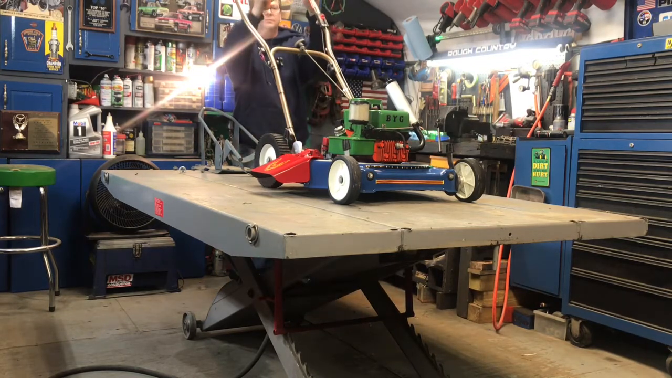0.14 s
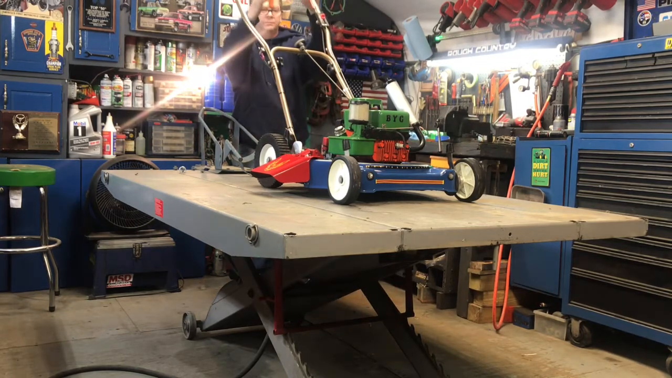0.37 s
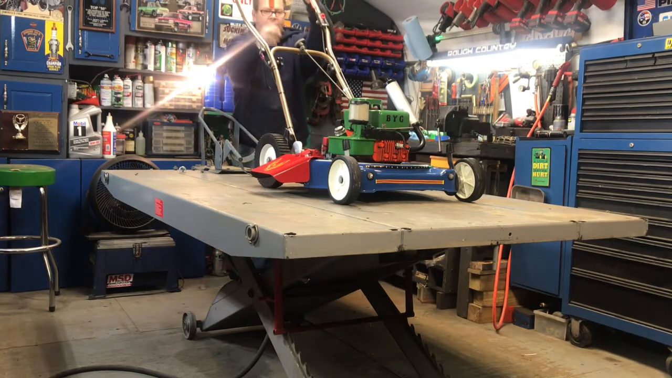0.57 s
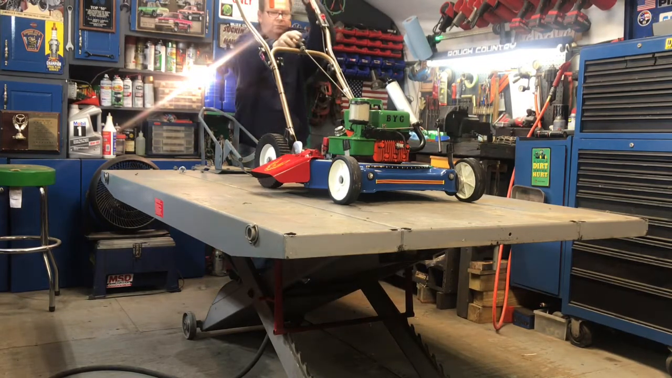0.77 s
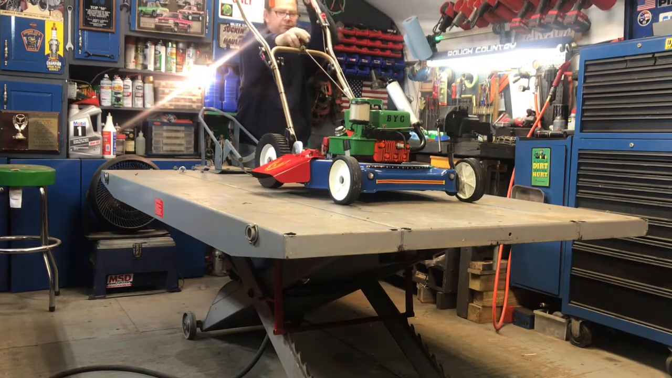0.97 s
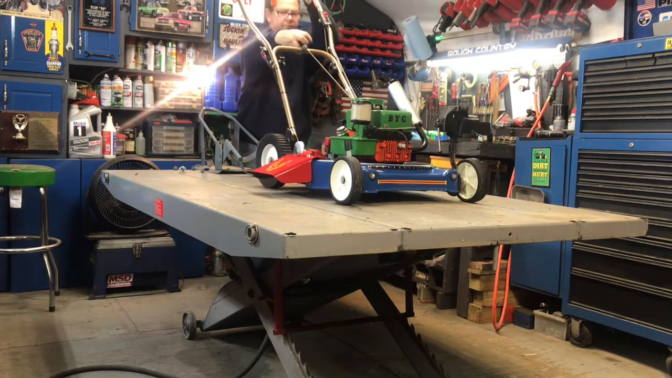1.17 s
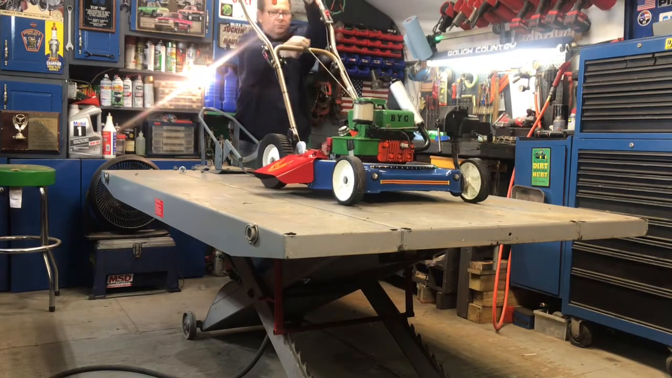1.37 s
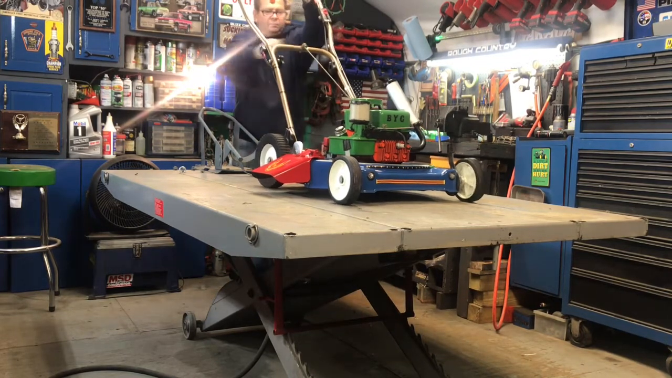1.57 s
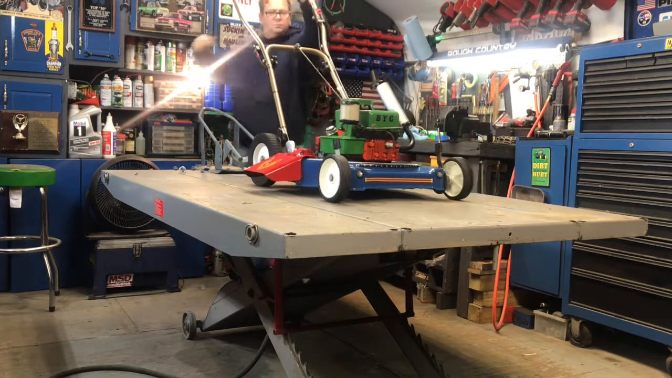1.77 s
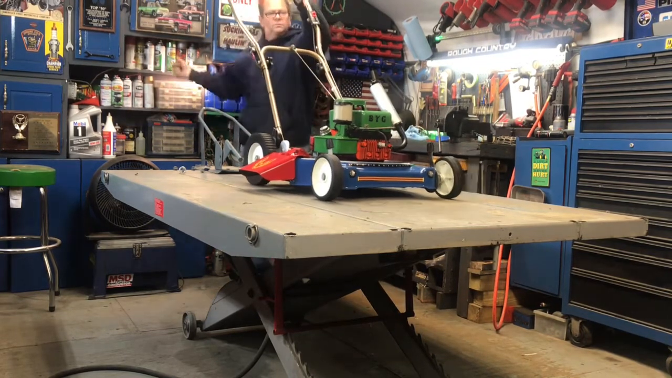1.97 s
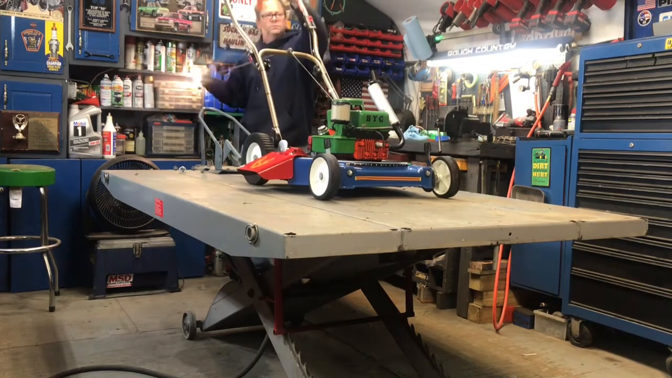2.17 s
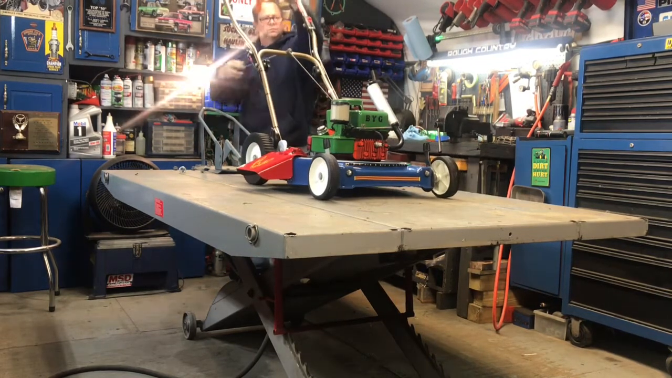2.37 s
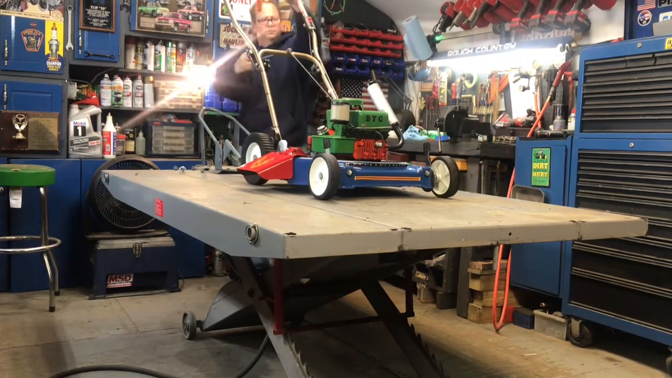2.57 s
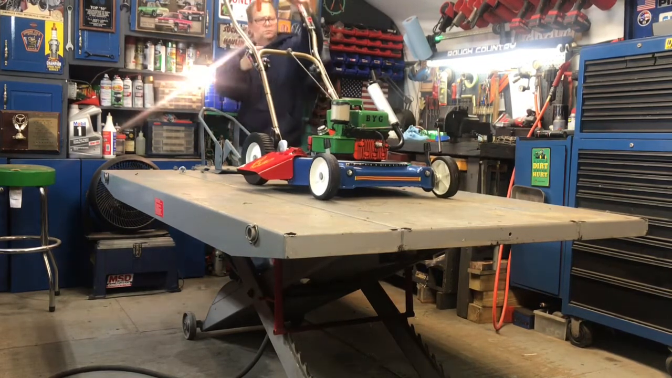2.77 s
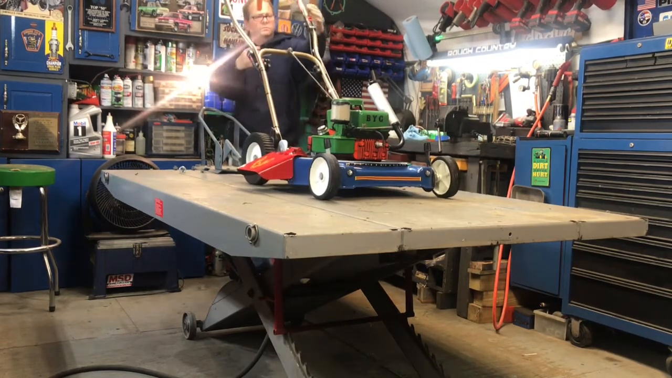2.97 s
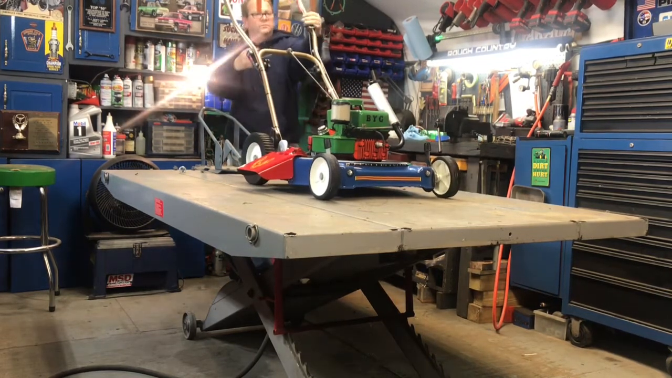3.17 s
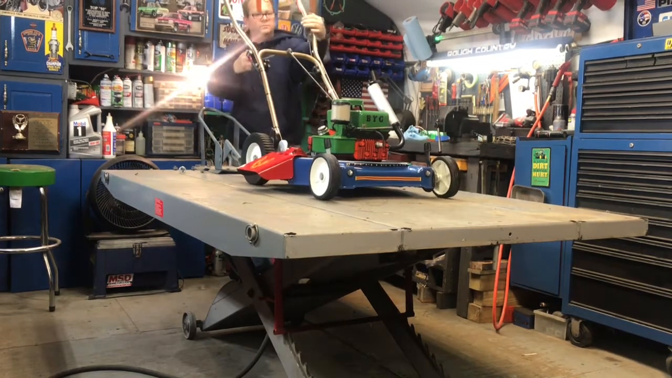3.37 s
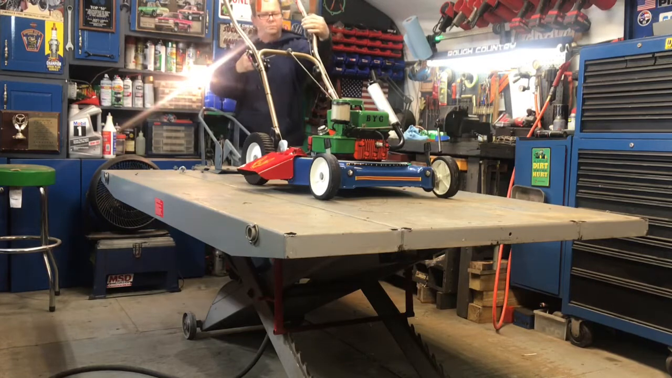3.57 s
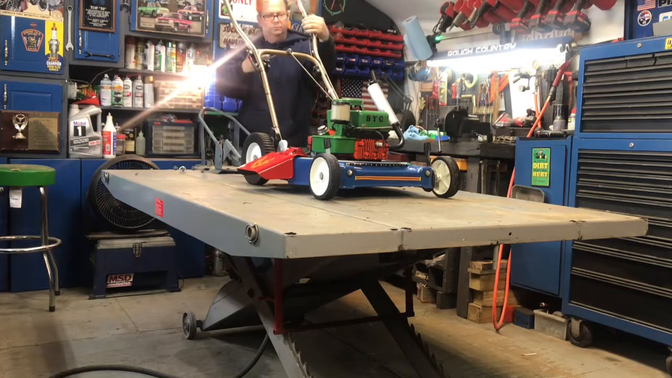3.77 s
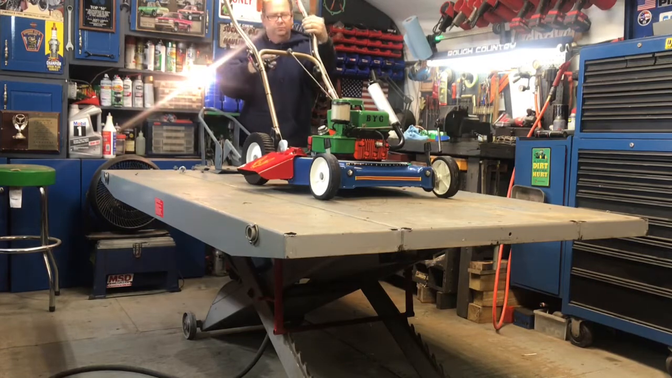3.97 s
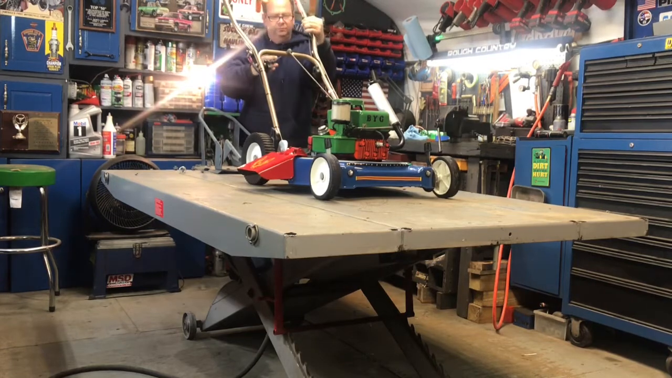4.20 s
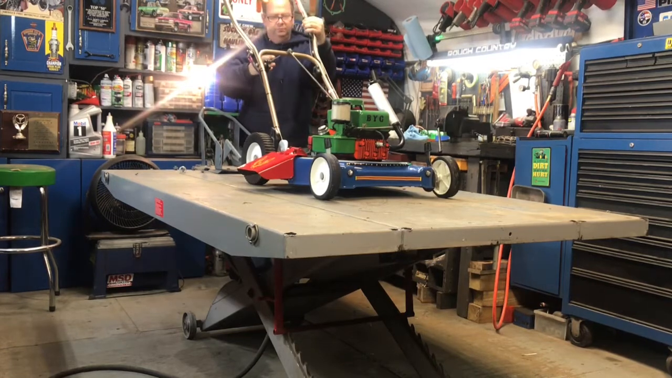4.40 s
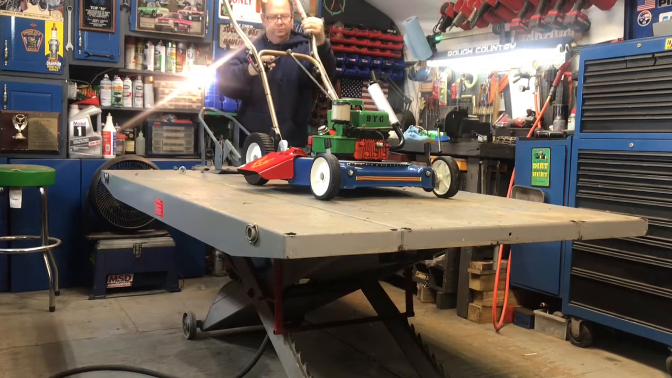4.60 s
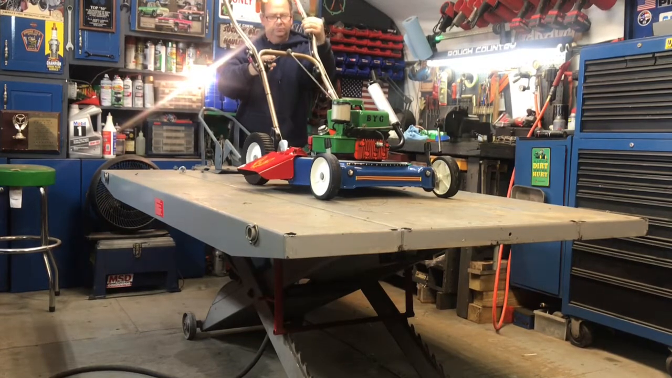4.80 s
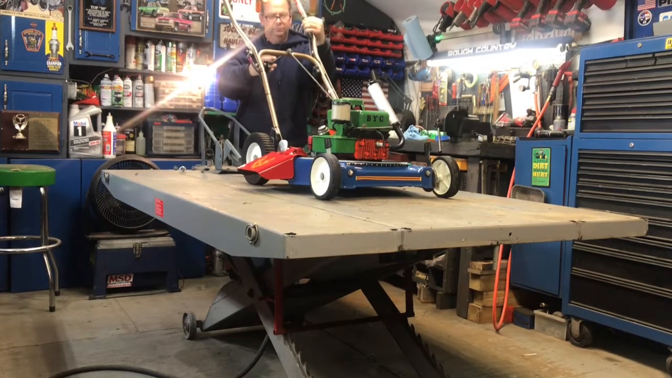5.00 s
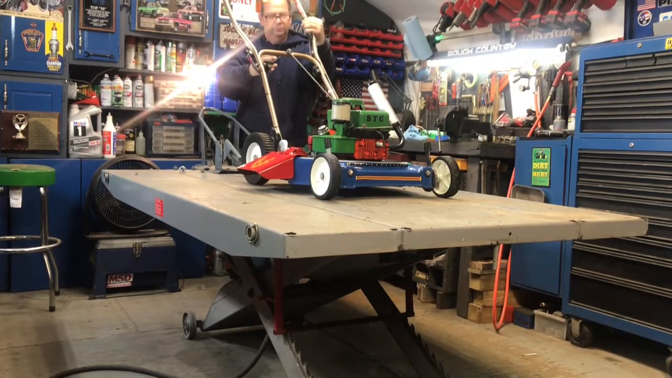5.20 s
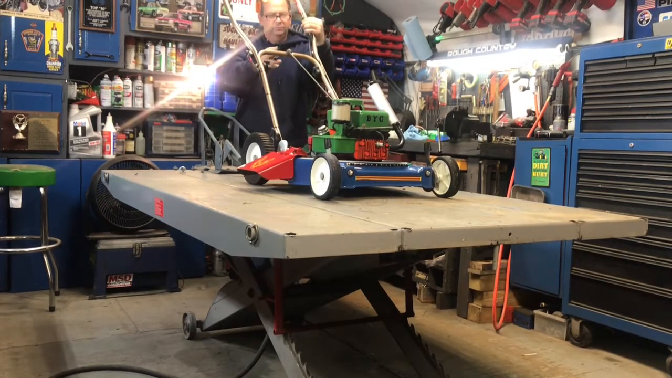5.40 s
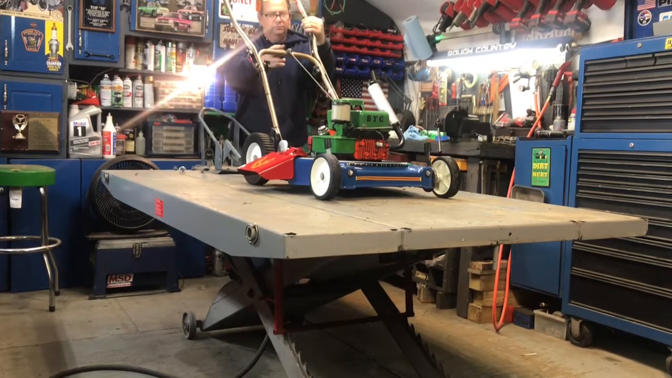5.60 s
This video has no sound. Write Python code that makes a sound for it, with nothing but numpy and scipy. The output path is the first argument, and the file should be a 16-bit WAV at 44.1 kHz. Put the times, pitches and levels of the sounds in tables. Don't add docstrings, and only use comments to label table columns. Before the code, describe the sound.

The first 1.3 seconds are quiet: low garage rumble, faint hiss and small metallic knocks. A dull clunk with light clinks comes at about 0.05 s, a faint tick near 0.26 s, and soft taps around 1.0 and 1.2 s. From 1.32 s the starter pawls rasp and clack quickly, hardest at about 1.45 s, and the small two-stroke mower bursts in near 1.5 s. Its first turns are uneven, with weak coughs and a stronger surge around 1.8 to 2.4 s. It then idles at six or seven beats per second, each a low muffler thump with a bright exhaust hiss and metallic clack, over rattling deck parts, fan air and faint low blade whooshes. From about 3.5 s the throttle opens; after 4.4 s the beats quicken to around twelve per second, with harder midrange knocking and stronger hiss, running on to the end at about 5.6 s. A short room tail surrounds it.

```python
import sys
import numpy as np
from scipy import signal
from scipy.fft import rfft, irfft, next_fast_len
from scipy.io import wavfile
from scipy.ndimage import uniform_filter1d

SR = 44100
rng = np.random.default_rng(int(sys.argv[2]) if len(sys.argv) > 2 else 0)


def store_pcm(level_fs):
    pcm = np.round(np.clip(level_fs, -1, 1) * 32767).astype(np.int16)
    wavfile.write(sys.argv[1], SR, np.atleast_2d(pcm).T)


def invert_db(level):
    return 10 ** (np.asarray(level, dtype=float) / 20)


N = 249165

# (time [s], speed [turns/s])
CRANK_SPEED = [(1.48, 6.72), (1.76, 5.74), (2.0, 7.69), (2.14, 7.15), (2.4, 6.94), (3.24, 6.06),
               (4.01, 6.3), (4.19, 6.84), (4.41, 6.97), (4.9, 9.93), (5.65, 12.38)]
FIRST_TURN_S, IDLE_TURNS_PER_S = 1.476, 6.5
# (time [s], opening [0-1])
THROTTLE = [
    (1.5, 0),
    (3.5, 0),
    (4.1, 0.44),
    (4.4, 0.58),
    (4.52, 0.68),
    (5.0, 0.97),
    (5.3, 0.99),
    (5.65, 0.99),
]
PRIMED_S, PRIME_LASTS_S = 1.83, 0.4
# (idle level [dB], gain at full throttle [dB], gain while primed [dB], scatter [dB])
PORT_HISS = (-30.5, 6, 2, 1.1)
THUMP = (-25, 4.5, 9.5, .5)
PISTON_CLACK = (-26, -1, 2, 0.1)
FIRING_KNOCK = (-51, 33, -1, 2)
# (time [s], hiss [dB], thump [dB], clack [dB], knock [dB])
ODD_TURNS = [(1.476, -39, -25, -13, 19.5), (1.63, -13, -10, -2, 16), (1.798, -1.5, -7, -3, 28),
             (1.949, -2, 0, -1, -8), (2.222, -30, -3, -1, -5), (2.363, 4, 1.5, 0, -12),
             (2.965, -1, -1.5, 1.5, 11), (3.121, 0.5, -1, 0, -4), (3.613, -2.5, 0, -1, 11),
             (3.773, -0.5, -2, 1, 4), (3.934, -3, 1, 1, -1), (4.385, -3.5, -1.5, 0, -2),
             (4.647, 1, -1, 0.5, 3), (5.25, -3.5, 0, 0, 1.5), (5.427, -4, -4.5, -1, 1.5)]
# (time [s], level [dB])
SHAKE = [(1.2, -24), (1.27, -23), (1.4, -11.5), (1.46, -2), (1.56, -6), (1.58, 0.5), (1.61, -2), (1.84, -1),
         (2.08, 1), (2.2, 0.5), (4.6, 0.5), (5.46, 1.5), (5.65, 1)]
# (running level [dB], follow [dB per dB of shaking], while primed [dB], at full throttle [dB])
LOOSE_PARTS = (-32, 1.16, -0.5, -2.5)
FAN_AIR = (-34, 1.67, 7.5, 2.9)
BLADE_SWEEP = (-44, .9, -3, -2.5)
# (frequency [Hz], level [dB])
JET_SPECTRUM = [(2000, -35), (4000, -9), (5450, 3.5), (6660, -1.5), (7500, -3), (8300, 1.5), (9200, 1.5),
                (10500, -7.5), (11500, 0), (13100, -2), (15600, -5), (15900, -42)]
# (frequency [Hz], level [dB])
FAN_SPECTRUM = [(1800, 1), (3000, 2.5), (4500, 5.5), (5000, -2), (6500, 1), (7500, -7), (9000, -3),
                (10500, -7), (13000, -6.5), (15600, -10), (15900, -45)]
# (frequency [Hz], width [Hz], level [dB])
MUFFLER_MODES = [(70, 54, 1.8), (142.7, 10.8, 0.9), (550, 64, 1.9)]
# (frequency [Hz], level [dB])
CLACK_SPECTRUM = [(900, 5.5), (1500, -2.5), (2000, 1.5), (2700, 5), (3500, 3.5), (4400, 3), (5000, -2.5),
                  (6500, -3), (9000, -27), (12000, -42)]
# (frequency [Hz], level [dB])
FIRING_SPECTRUM = [(900, -41), (1400, -1), (1750, 18), (2000, 9), (2350, 18.5), (2900, 0.5), (4000, -36)]
# (frequency [Hz], level [dB])
RATTLE_SPECTRUM = [(71, -33), (120, 1), (157, -4.5), (252, -10.5), (324, -5), (381, -5.5), (668, -9),
                   (941, -2.5), (1070, -2), (1480, 0.5), (1940, -5), (2630, -8.5), (3580, -8.5),
                   (7510, -18), (9000, -30), (11700, -79), (19800, -120)]
# (frequency [Hz], width [Hz], level [dB])
DECK_MODES = [(548, 20, -8), (750, 30, -5), (885, 25, -3), (922, 25, -3), (985, 28, -2), (1160, 45, -6),
              (1300, 25, -5), (1340, 25, -7), (1516, 28, -3), (1690, 28, 0), (1770, 35, -7), (2230, 40, -6),
              (2395, 40, -6), (2590, 30, -1), (2675, 30, -3), (2822, 30, -4), (3352, 30, -4),
              (3481, 40, -5), (3630, 45, -6), (3900, 60, -8)]
# (time [s], clack [dB], rasp [dB])
PAWLS = [
    (1.322, -70, -47),
    (1.36, -64, -52),
    (1.394, -57, -39),
    (1.403, -44, -50),
    (1.413, -31.5, -45),
    (1.4535, -27, -47),
    (1.559, -45, -33.5),
    (1.5745, -37, -43),
]
# (time [s], level [dB], centre [Hz], spread [octaves], t60 [s])
KNOCKS = [(.001, -66, 2760, 0.059, 0.23), (.001, -66, 3530, .05, .25), (0.053, -46.5, 3700, 0.27, 0.29),
          (0.055, -48.5, 1840, 0.33, 0.099), (0.06, -37.5, 325, 0.63, 0.15), (0.068, -43, 750, 0.64, 0.18),
          (.12, -48.5, 3160, 0.8, 0.12), (.139, -58, 4200, 0.13, 0.11), (.26, -64, 2480, 0.46, .15),
          (.262, -52, 950, .5, 0.31), (.9, -59.5, 2980, 0.7, 0.97), (1.15, -59, 3000, 1.2, 0.37),
          (.29, -68, 920, 0.67, .2), (0.981, -52, 1740, 0.87, 0.29), (0.991, -47.5, 1050, 0.27, 0.21),
          (0.989, -50, 476, 0.082, 0.096), (1.1, -56.5, 9100, 0.77, 0.17), (1.199, -58, 1980, 0.38, .12),
          (1.202, -46, 920, 0.16, 0.15), (1.204, -48, 503, 0.79, 0.15)]
# (frequency [Hz], width [Hz], level [dB])
BENCH_MODES = [(306, 18, 2), (466, 22, -9), (540, 19, -9), (825, 10, -3), (928, 14, -12), (950, 13, -3),
               (1220, 16, -13), (1740, 22, -9), (2010, 35, -16), (2760, 30, -21), (3480, 120, -17)]
# (frequency [Hz], level [dB])
RUMBLE_SPECTRUM = [(18, -56), (30, -18), (53, -2), (73, 8), (85, -1.5), (108, -12.5), (155, -7), (182, -28),
                   (237, -20.5), (276, -23), (444, -27), (479, -21), (600, -57), (780, -78), (1320, -120)]
# (frequency [Hz], level [dB])
HISS_SPECTRUM = [(350, -24), (600, -4), (788, -4), (856, -11.5), (892, -4), (1220, -10.5), (1520, -11),
                 (2520, -23), (3490, -19), (4850, -27), (6730, -16), (7510, -21.5), (12600, -9.5),
                 (15700, -18)]


def colour(x, spectrum, modes=(), modes_db=0):
    size = next_fast_len(len(x) + SR // 4)
    hz = np.arange(size // 2 + 1) * SR / size + 1e-9
    at_hz, db = np.transpose(spectrum)
    gain = invert_db(np.interp(np.log(hz), np.log(at_hz), db, left=-120))
    ringing = sum(invert_db(mode_db) * peak(hz, f_hz, width_hz) for f_hz, width_hz, mode_db in modes)
    gain = gain * (1 + invert_db(modes_db) * ringing)
    y = irfft(rfft(x, size) * gain, size)[:len(x)]
    return y / np.sqrt(np.mean(y ** 2))


def peak(hz, centre_hz, width_hz):
    return 1 / (1 + 1j * (hz / centre_hz - centre_hz / hz) * centre_hz / width_hz)


def bursts(times_s, db, rise_s, fall_s):
    t = np.arange(N) / SR
    out = np.zeros(N)
    for at, level_db, rise, fall in np.broadcast(times_s, db, rise_s, fall_s):
        start = int(at * SR)
        age = t[start:int((at + 8 * (fall + rise)) * SR)] - at
        onset = 1 - np.exp(-np.abs(age) / rise)
        out[start:][:len(age)] += invert_db(level_db) * onset * np.exp(-age / fall)
    return out


def grit(scatter_db):
    return rng.standard_normal(N) * invert_db(scatter_db * rng.exponential(size=N))


def flicker(rate_hz, depth_db):
    k = int(SR / rate_hz)
    held = np.repeat(rng.standard_normal(N // k + 1), k)
    return invert_db(depth_db * uniform_filter1d(held, k)[:N])


def crank():
    t = np.arange(int(FIRST_TURN_S * SR), N) / SR
    turns = np.cumsum(np.interp(t, *np.transpose(CRANK_SPEED))) / SR
    return np.interp(np.arange(int(turns[-1]) + 1), turns, t)


def effort(t):
    throttle = np.interp(t, *np.transpose(THROTTLE))
    prime = np.exp(-np.maximum(t - PRIMED_S, 0) / PRIME_LASTS_S)
    return throttle, prime


def strokes(opens_s):
    settings = np.transpose([PORT_HISS, THUMP, PISTON_CLACK, FIRING_KNOCK])
    idle, opened, primed, scatter = settings[:, :, None]
    throttle, prime = effort(opens_s)
    uneven = scatter * rng.standard_normal((len(opens_s), len(idle))).T
    db = idle + opened * throttle + primed * prime + uneven
    for at, *change_db in ODD_TURNS:
        db[:, np.argmin(np.abs(opens_s - at))] += change_db
    return db


def running(t):
    shake_db = np.interp(t, *np.transpose(SHAKE), left=-60)
    throttle, prime = effort(t)
    return [db + follow * shake_db + primed * prime + opened * throttle
            for db, follow, primed, opened in (LOOSE_PARTS, FAN_AIR, BLADE_SWEEP)]


def exhaust(opens_s, turn_s, hiss_db, air_db):
    rise_s = 0.0004
    rush = bursts(opens_s, hiss_db - 5.5, rise_s, 0.27 * turn_s + 0.012)
    rush = rush + bursts(opens_s + 0.7 * turn_s, hiss_db - 7.5, 0.003, 0.033)
    stall = np.clip(bursts(opens_s - 0.028, 0, 0.0093, 0.016) * 2.5, 0, 1)
    reopened = np.clip(bursts(opens_s, 6, 0.001, 0.02), 0, 1)
    flow = np.maximum(1 - 0.57 * stall, reopened)
    pawl_s, _, rasp_db = np.transpose(PAWLS)
    rasp = bursts(pawl_s, rasp_db - 3.5, rise_s, 0.054)
    jet, draught = (flicker(120, 1.2) * grit(1.2) for _ in range(2))
    jet = (rush + rasp) * colour(jet, JET_SPECTRUM)
    draught = invert_db(air_db - 5.5) * colour(draught, FAN_SPECTRUM)
    return flow * (jet + draught)


def muffler(opens_s, turn_s, thump_db):
    push = bursts(opens_s + 0.0104, thump_db + 2.0, 0.0023, 0.0019)
    push = push + bursts(opens_s + 0.02263, thump_db - 5, 0.002, 0.0016)
    transfer_db = thump_db - 1.5 - 2.44 * (1 / turn_s - IDLE_TURNS_PER_S)
    transfer_s = opens_s + 0.75 * turn_s
    push = push + bursts(transfer_s, transfer_db, 0.00076, 0.00075)
    push = push - bursts(transfer_s + 0.00403, transfer_db - 4, 0.0012, 0.0014)
    size = next_fast_len(N + SR)
    hz = np.arange(size // 2 + 1) * SR / size + 1e-9
    mouth = (1j * hz) ** 2 / (55 + 1j * hz) / (40 + 1j * hz)
    body = sum(invert_db(db) * peak(hz, f_hz, width_hz) for f_hz, width_hz, db in MUFFLER_MODES)
    return -8 * irfft(rfft(push, size) * mouth * body, size)[:N]


def metalwork(opens_s, turn_s, clack_db, firing_db, rattle_db):
    slap = bursts(opens_s + 0.3 * turn_s, clack_db, 0.0036, 0.034)
    slap = slap + bursts(opens_s + 0.744 * turn_s, clack_db - 10.5, 0.0071, 0.017)
    pawl_s, pawl_db, _ = np.transpose(PAWLS)
    slap = slap + bursts(pawl_s, pawl_db - 3, 0.00077, 0.023)
    knock = bursts(opens_s - 0.015, firing_db - 2.5, 0.005, 0.0094)
    knock = knock + bursts(opens_s + 0.006, firing_db - 8, 0.001, 0.008)
    slap, knock, loose = slap * grit(1.6), knock * grit(2.5), grit(2)
    jolt = 1 + bursts(opens_s - 0.012, firing_db + 30, 0.02, 0.38 * turn_s)
    jolt = jolt + bursts(opens_s + 0.73 * turn_s, 0, 0.0031, 0.097 * turn_s)
    shake = invert_db(rattle_db - 1.5) * jolt * flicker(70, 1.76) * flicker(11, 0.17)
    slap = colour(slap, CLACK_SPECTRUM, DECK_MODES, 5) * np.sqrt(np.mean(slap ** 2))
    knock = colour(knock, FIRING_SPECTRUM, DECK_MODES, 1.4) * np.sqrt(np.mean(knock ** 2))
    return slap + knock + shake * colour(loose, RATTLE_SPECTRUM, DECK_MODES, 3)


def blade(opens_s, turn_s, sweep_db):
    passes = sum(bursts(opens_s + tip * turn_s, 0, 0.08 * turn_s, 0.08 * turn_s) for tip in (0.27, 0.77))
    ring_hz = 322 * flicker(30, 0.15)
    ring = np.sin(2 * np.pi * np.cumsum(ring_hz) / SR)
    return invert_db(sweep_db + 20.5) * passes * flicker(20, 1.5) * ring


def knocks():
    out = np.zeros(N)
    size = SR * 2
    around = np.linspace(-4, 4, num=17)
    for at, db, hz, octaves, t60_s in KNOCKS:
        envelope = bursts(at, 0, 0.002, t60_s / np.log(1000))[:size]
        blow = rng.standard_normal(size) * envelope
        spectrum = np.transpose([hz * 2 ** (octaves * around), -6 * around ** 2])
        out[:size] += invert_db(db - 19.5) * colour(blow, spectrum, BENCH_MODES, 5.1)
    return out


def room(near):
    t60_s, gap_s, level_db = 0.6, 0.005, -10.5
    age = np.arange(SR // 2) / SR
    walls = rng.standard_normal(SR // 2) * np.exp(-np.log(1000) * age / t60_s) * (age > gap_s)
    walls = colour(walls, [(60, -31), (300, 5.5), (5000, -1.5), (16000, -1.5)]) / np.sqrt(SR // 2)
    return invert_db(level_db) * signal.fftconvolve(near, walls)[:N]


def garage(t):
    rumble_db, hiss_db = -42, -57
    duck_db, duck_from_s, duck_takes_s = -3, 1.65, 0.27
    rumble = invert_db(rumble_db) * colour(rng.standard_normal(N), RUMBLE_SPECTRUM)
    hiss = invert_db(hiss_db) * colour(rng.standard_normal(N), HISS_SPECTRUM)
    return (rumble + hiss) * invert_db(duck_db * np.clip((t - duck_from_s) / duck_takes_s, 0, 1))


def scene():
    t = np.arange(N) / SR
    opens_s = crank()
    turn_s = np.diff(opens_s, append=2 * opens_s[-1] - opens_s[-2])
    hiss_db, thump_db, clack_db, firing_db = strokes(opens_s)
    rattle_db, air_db, sweep_db = running(t)
    near = exhaust(opens_s, turn_s, hiss_db, air_db)
    near = near + metalwork(opens_s, turn_s, clack_db, firing_db, rattle_db)
    near = near + knocks()
    lows = muffler(opens_s, turn_s, thump_db) + blade(opens_s, turn_s, sweep_db)
    return (near + room(near) + lows + garage(t))[None]


def band_limit(x):
    return signal.sosfilt(signal.butter(12, 16450, fs=SR, output="sos"), x)


def record(dry):
    top = signal.ellip(8, 0.2, 70, 15850, fs=SR, output="sos")
    mix = signal.sosfilt(top, dry)
    return band_limit(mix)


dry = scene()
out = record(dry)
store_pcm(out)
```